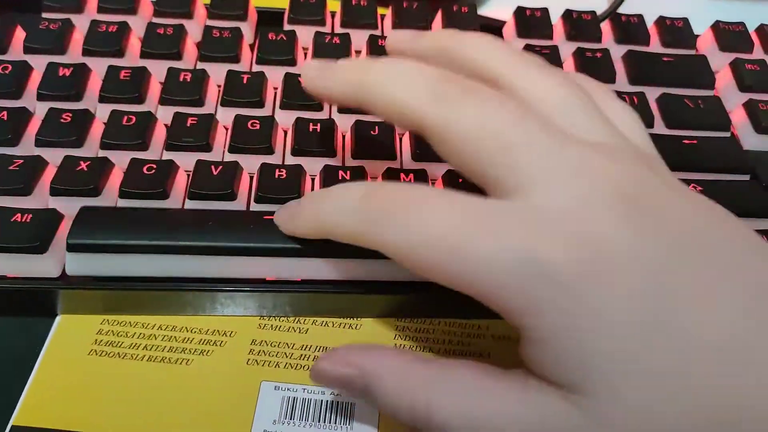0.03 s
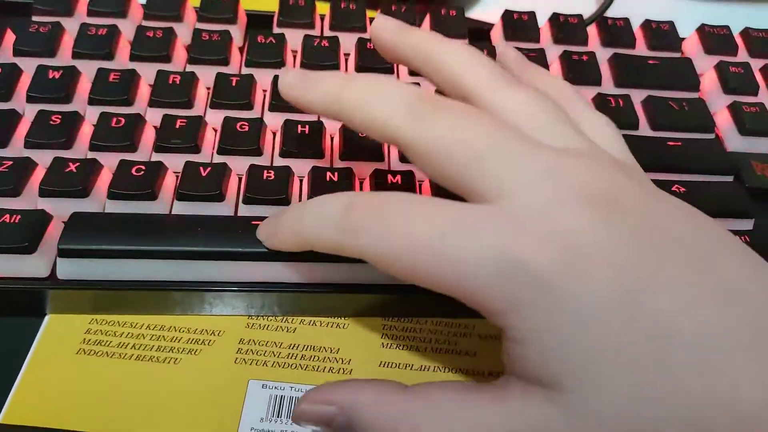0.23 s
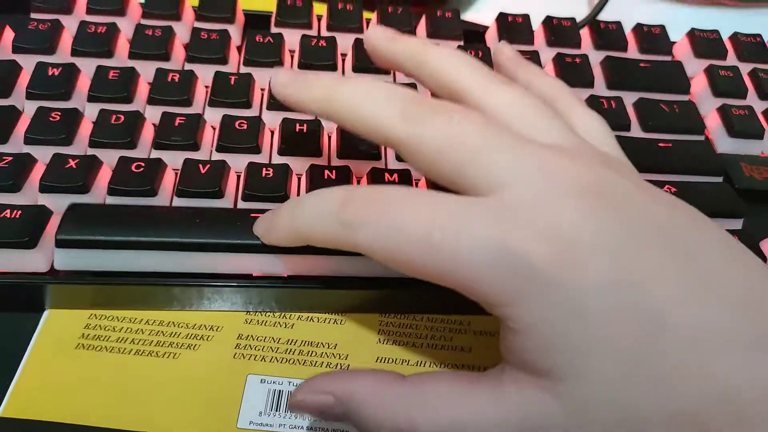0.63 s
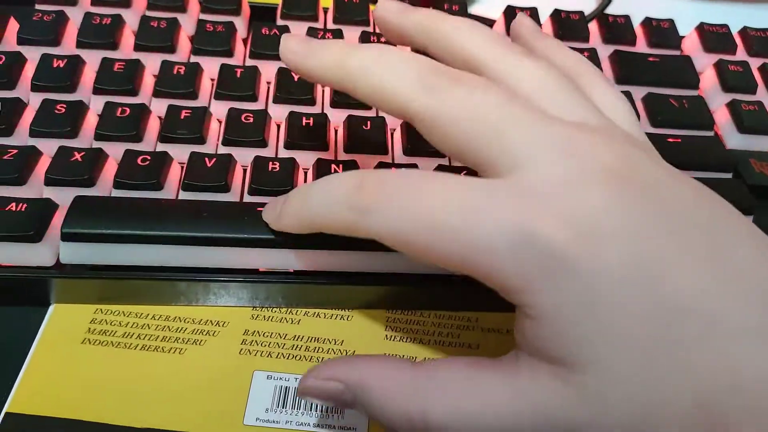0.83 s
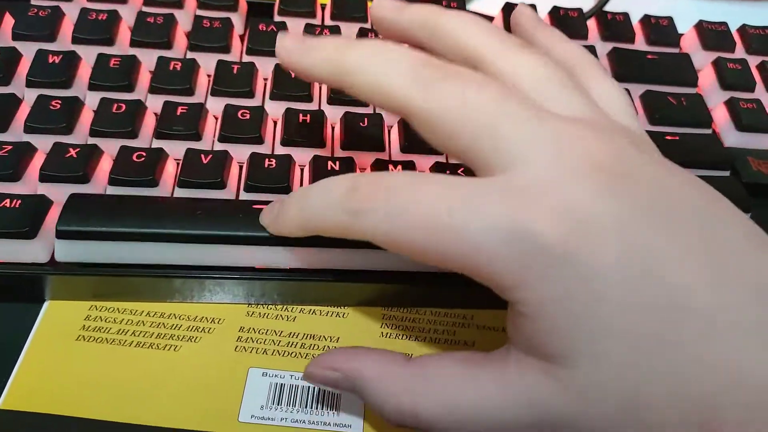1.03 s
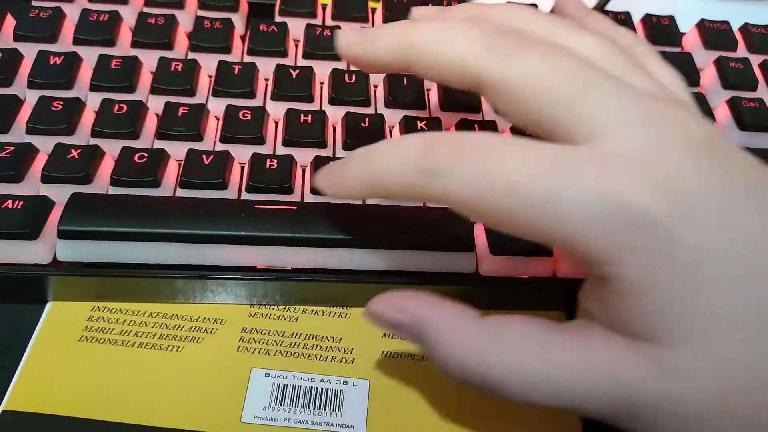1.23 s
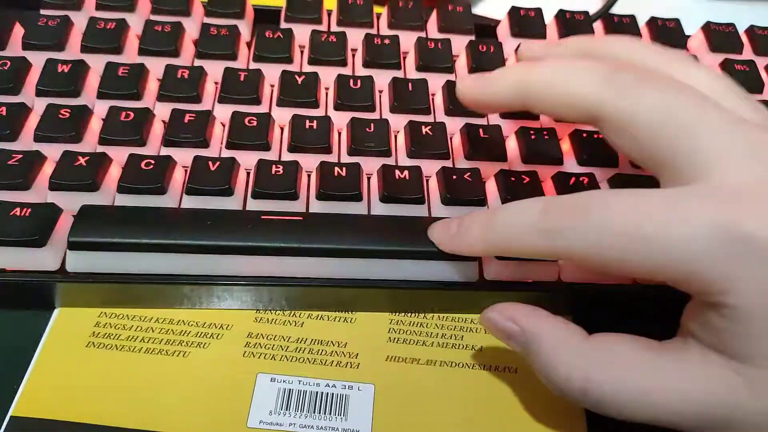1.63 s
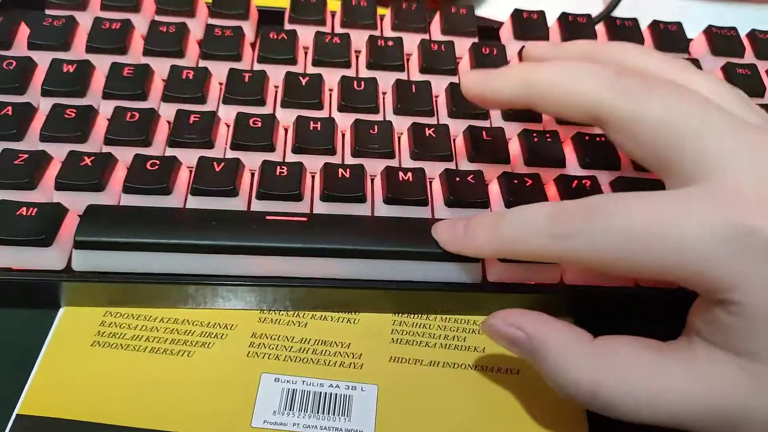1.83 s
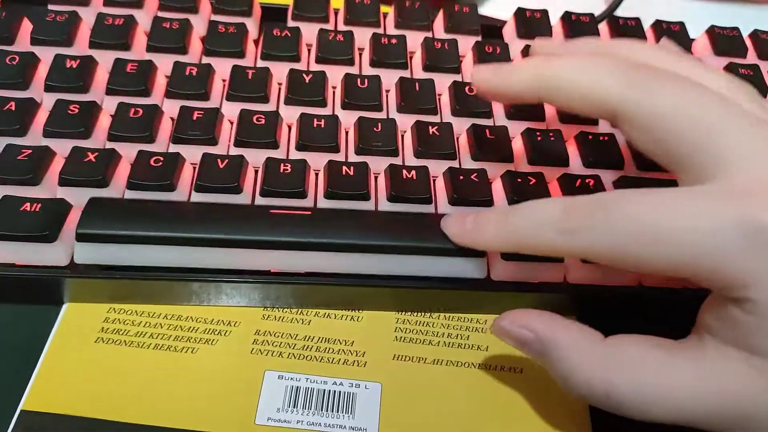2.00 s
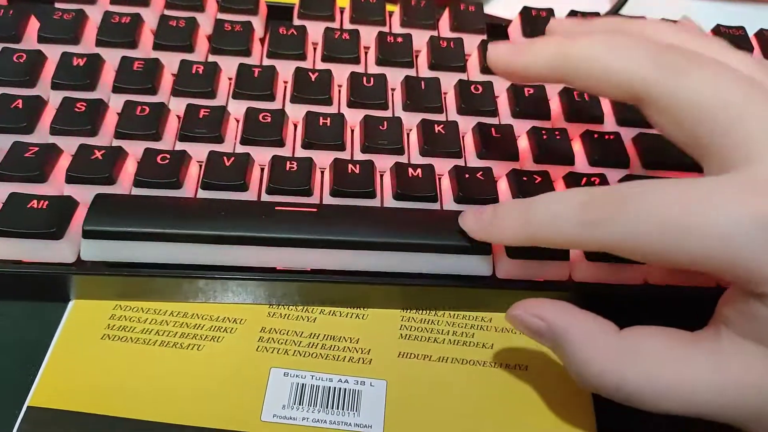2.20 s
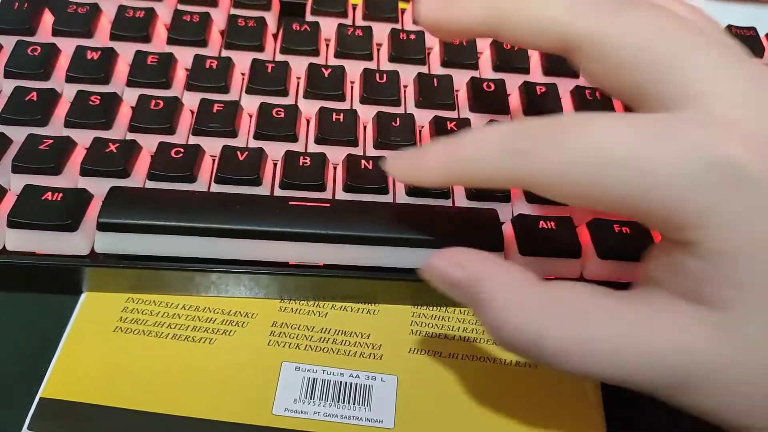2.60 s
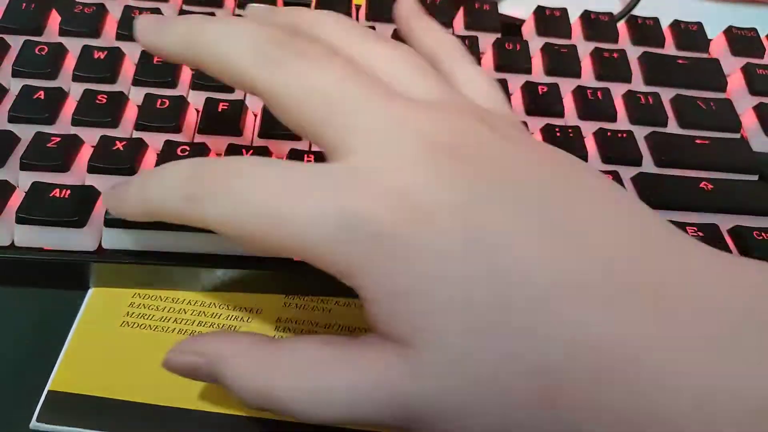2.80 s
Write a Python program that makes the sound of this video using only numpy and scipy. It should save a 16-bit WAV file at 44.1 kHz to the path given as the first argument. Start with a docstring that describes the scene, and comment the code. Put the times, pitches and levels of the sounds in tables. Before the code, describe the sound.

Sharp, rattling spacebar taps on a mechanical keyboard come in two quick, even bursts.

```python
"""Quick rattles and clacks over a faint fan hum: a finger taps a keyboard's spacebar in two runs of seven.
Each stroke has three impacts: the loose bar rattles as the finger lands, clacks on the bottom, and
clatters as it springs back up. Each impact excites the damped modes of bar, plate and case.
Desk and keys scatter the sound and the small, quiet room reverberates briefly.
At the end the hand brushes across the keys with a soft hiss of friction."""
import sys
import numpy as np
from scipy import signal
from scipy.fft import rfft, irfft
from scipy.io import wavfile

SR = 44100
rng = np.random.default_rng(int(sys.argv[2]) if len(sys.argv) > 2 else 0)


def wav_out(sig):
    """Save sig, one row per channel (or a flat mono array), as 16-bit PCM at SR to the path in sys.argv[1]."""
    wavfile.write(sys.argv[1], SR, np.round(np.clip(np.atleast_2d(sig).T, -1, 1) * 32767).astype(np.int16))


N = 130095
T = np.arange(N) / SR
BLOW_SIZE, LEAD_S = 8192, .03   # samples in one impact; time ahead of its main contact


def finger_landings():
    """Backlash: the landing finger takes up the bar's play, and the loose parts rattle."""
    # landings: (time [s], gain [dB], rattle decay time [s], treble [dB])
    touches = [(0.2078, -2, 0.0041, 2), (0.377, -9.5, 0.009, 3.5), (0.538, -10.5, 0.0066, 1),
               (0.7051, -7, 0.002, 7), (0.862, -8.5, 0.0084, 0), (1.032, -7.5, 0.0037, 6.5),
               (1.205, -8.5, 0.0021, 5), (1.5932, -5, 0.0021, 6), (1.7723, -4.5, .004, 2.5),
               (1.931, -1, 0.0033, -1.5), (2.085, -2.5, 0.0025, -4), (2.2534, -1.5, 0.0026, -1),
               (2.408, -1.5, 0.0016, 2.5), (2.566, -3, 0.0023, 1)]
    # spectral envelope of a landing: (frequency [Hz], gain [dB])
    colour = [(100, -20), (300, -3), (600, -12), (1000, 4), (1750, 1.5), (2050, 17.5), (2600, 9),
              (3100, 14.5), (4000, 9.5), (5000, -6), (7500, -8), (9500, -15.5), (14000, -10.5)]
    track = np.zeros(N)
    for time_s, db, decay_s, treble_db in touches:
        force = rattle(decay_s, snap=.29)
        add(track, time_s - LEAD_S, strike(force, db + shelved(colour, treble_db, 0), ring_db=-2.5))
    return track


def bottom_clacks():
    """Impact: the bar hits the bottom, with more bite when it is played near its end."""
    # impacts: (time [s], gain [dB], bite [dB])
    clacks = [(0.2359, -3.5, 0.5), (.4000, -.5, -1), (0.5591, -1, 1), (0.7243, -0.5, 1), (0.8811, 0, -2),
              (1.0494, -0.5, 6), (1.224, 0, -2), (1.6214, -1, 3), (1.7907, -1, 2), (1.9518, -1.5, 2),
              (2.1072, -2.5, 3), (2.2688, -.5, 1), (2.4250, -0.5, 2), (2.5831, -.5, 2.5)]
    # spectral envelope of a clack: (frequency [Hz], gain [dB])
    colour = [(100, -14.5), (230, 1.5), (310, 10.5), (440, 4.5), (530, -6.5), (830, 2.5), (1020, 14.5),
              (1400, 5), (1900, 16), (2450, 23), (3100, 22), (3550, 12), (4250, 4), (4900, 4), (6500, -8),
              (8200, -16), (9800, -6.5), (12200, -14.5), (14000, -16)]
    track = np.zeros(N)
    for time_s, db, bite_db in clacks:
        tone_db = db + at_hz(colour, grid(BLOW_SIZE)) + bite_db * bump(hz=3200, octaves=.1)
        add(track, time_s - LEAD_S, strike(bottoming_force(), tone_db, ring_db=1.5))
    return track


def spring_returns():
    """Restoring force: the bar springs against its top stop, knocking more when played near its end."""
    # returns: (time [s], gain [dB], rattle decay time [s], treble [dB], bass [dB], knock [dB], snap [ratio])
    returns = [(.302, -3.5, 0.0075, 5, 5.5, 4.5, 0.36), (.473, -2.5, .005, 5.5, 8, 1, 0.23),
               (0.639, 1, .008, 1.5, 3.5, -1.5, 0.11), (.810, -2.5, 0.0055, 4.5, 7.5, -3.5, 0.11),
               (0.965, 3.5, 0.0041, 2, 1, -2.5, 0.14), (1.1338, 4, .004, 1, 1.5, 0, 0.28),
               (1.2983, 7.5, 0.0021, 2, -5, -3, 0.41), (1.7034, 1, 0.0042, 4, -5, 6.5, 0.05),
               (1.869, 0, 0.0043, 3.5, 1.5, 6, .15), (2.026, -2.5, 0.0035, 5, -2, 8.5, 0.16),
               (2.177, -1, 0.0037, 4, 3, 2, 0.1), (2.3445, -0.5, 0.0031, 5.5, 4, 8.5, 0.2),
               (2.498, 2, 0.0032, 2.5, -2, 5, 0.18), (2.686, -4.5, 0.009, 0, -1, 4, 0.061)]
    # spectral envelope of a return: (frequency [Hz], gain [dB])
    colour = [(100, -21.5), (280, 1), (400, -6), (660, -4), (800, 6.5), (1100, 6), (1700, 7.5),
              (2050, 14.5), (2550, 8.5), (3100, 14.5), (3600, 8.5), (4300, 4.5), (5000, -7.5), (7000, -8.5),
              (9500, -12), (14000, -14)]
    track = np.zeros(N)
    for time_s, db, decay_s, treble_db, bass_db, knock_db, snap in returns:
        tone_db = db + shelved(colour, treble_db, bass_db) + knock_db * bump(hz=850, octaves=.18)
        add(track, time_s - LEAD_S, strike(rattle(decay_s, snap), tone_db, ring_db=-2.5))
    return track


def click():
    """Impulse: one hard contact has a flat spectrum."""
    return signal.unit_impulse(BLOW_SIZE, int(LEAD_S * SR))


def rattle(decay_s, snap, contacts_per_s=4500, rise_share=.84, scatter_db=3):
    """Shot noise: tiny contacts swell and die around a hard one of relative size snap; energy 1."""
    t = np.arange(BLOW_SIZE) / SR - LEAD_S
    swell = np.exp(-np.abs(t) / (decay_s * np.where(t < 0, rise_share, 1)))
    sizes = from_db(scatter_db * rng.standard_normal(BLOW_SIZE)) * rng.choice([-1, 1], BLOW_SIZE)
    contacts = swell * sizes * (rng.random(BLOW_SIZE) < contacts_per_s / SR)
    force = contacts / np.linalg.norm(contacts) + snap * click()
    return force / np.linalg.norm(force)


def bottoming_force(bounce_s=.001908, bounce_db=-15, chatter_delay_s=.002, chatter_db=-1.5):
    """Rebound: one firm hit is followed by a small bounce and a burst of bright chatter."""
    hit = signal.sosfilt(signal.butter(1, 9000, fs=SR, output="sos"), click())
    bounce = from_db(bounce_db) * np.roll(hit, int(bounce_s * SR))
    highpass = signal.butter(3, 4530, "high", fs=SR, output="sos")
    chatter = signal.sosfilt(highpass, rattle(decay_s=.001, snap=0))
    return hit + bounce + from_db(chatter_db) * np.roll(chatter, int(chatter_delay_s * SR))


def strike(force, tone_db, ring_db, scatter_db=1.3, detune=.005):
    """Modal superposition: a force rings damped modes, which vary per blow as the finger shifts."""
    # modes of bar, plate and case: (frequency [Hz], T60 [s], relative gain [dB])
    modes = [(322, 0.11, -0.5), (447.4, 0.062, -2.5), (760, 0.071, -9), (1065.5, 0.091, -5.5),
             (1742, 0.073, -3), (2000, 0.076, -7), (2387, 0.029, -3), (2425, 0.023, -5.5),
             (2930, 0.12, -20), (3100, 0.02, -9.5), (3180, 0.075, -22), (4960, 0.066, -25)]
    hz, body = grid(BLOW_SIZE), 1
    for mode_hz, t60, lift_db in modes:
        gain_draw, pitch_draw = rng.standard_normal(2)
        gain = from_db(ring_db + lift_db + scatter_db * gain_draw)
        tuned_hz = mode_hz * (1 + detune * pitch_draw)
        damping = 1j * hz * np.log(1000) / (np.pi * t60)
        body = body + gain * damping / (tuned_hz ** 2 - hz ** 2 + damping)
    return irfft(rfft(force) * minimum_phase(tone_db) * body)


def direct_sound(source):
    """Path difference: the sound arrives later on the right and, at most frequencies, weaker."""
    # right side against left: (frequency [Hz], gain [dB])
    right_gain = [(200, -18.5), (400, 5), (750, -18), (1050, -6), (1700, -11.5), (2400, -13.5), (2900, -20),
                  (3300, -5), (5000, -6.5), (9000, -2.5), (14000, -5)]
    # later arrival on the right: (frequency [Hz], phase delay [s])
    right_lag = [(350, .00001), (1100, 0.000098), (2300, .0002), (3100, 0.000195), (4200, 0.000034),
                 (8000, 0.000038), (14000, 0.000019)]
    hz = grid(N)
    right_path = from_db(at_hz(right_gain, hz)) * np.exp(-2j * np.pi * hz * at_hz(right_lag, hz))
    return np.array([source, irfft(rfft(source) * right_path, N)])


def desk_scatter(tracks):
    """Early reflections: desk and keys scatter each kind of contact alike in level and decay, each along its
    own echo pattern."""
    # scatter from desk and keys: (frequency [Hz], level against the direct sound [dB])
    levels = [(200, -15), (1000, -5), (2600, -9.5), (5000, -5), (12000, -12)]
    return sum(reflections(track, levels, t60s=[(1, .018)], delay_s=.001229) for track in tracks)


def room_reverberation(source, right_db=-2):
    """Reverberation: repeated reflections ring on briefly as the room absorbs them."""
    # reverberation on the left: (frequency [Hz], level against the direct sound [dB])
    levels = [(150, -4.5), (300, -7), (600, -9), (1000, -12), (2600, -12.5), (5000, -7.5), (8000, -11.5),
              (14000, -16.5)]
    # decay of the room: (frequency [Hz], T60 [s])
    t60s = [(200, .45), (1000, 0.35), (3000, 0.38), (7000, 0.39), (14000, .3)]
    return reflections(source, levels, t60s, delay_s=.0065) * from_db([[0], [right_db]])


def reflections(source, levels, t60s, delay_s):
    """Diffuse field: dense echoes act as noise that decays exponentially in half-octave bands."""
    # left-right likeness of the echoes: (frequency [Hz], coherence [ratio])
    coherence = [(300, 0.85), (600, 0.23), (1200, 0.35), (2500, 0.041)]
    t, response = T[:SR // 2], 0
    edges_hz = 88 * 2 ** np.arange(0, 7.6, .5)
    white = rng.standard_normal((2, 2, len(t)))
    for k, (low, high) in enumerate(zip(edges_hz, edges_hz[1:])):
        hz = np.sqrt(low * high)
        alike = at_hz(coherence, hz)
        mid, side = white[k % 2]
        echoes = np.sqrt(1 + alike) * mid + np.sqrt(1 - alike) * side * [[1], [-1]]
        decay = np.exp(-np.log(1000) * t / at_hz(t60s, hz))
        bandpass = signal.butter(2, [low, high], "band", fs=SR, output="sos")
        band = signal.sosfilt(bandpass, echoes * decay + 1e-18)
        gain = np.sqrt(2 * (high - low) / SR) * from_db(at_hz(levels, hz))
        response = response + gain * band / np.linalg.norm(band, axis=1, keepdims=True)
    response = np.pad(response, ((0, 0), (int(delay_s * SR), 0)))
    return signal.fftconvolve(source[None], response, axes=1)[:, :N]


def hand_brush(start_s=2.767, rise_s=.081, level_db=-63.5):
    """Sliding friction: the hand makes soft broadband noise as it crosses the keys."""
    # friction spectrum: (frequency [Hz], relative density [dB])
    colour = [(400, -19.5), (1200, -9), (2800, -7), (5000, -7), (7200, -8), (9000, -21), (14000, -25)]
    return from_db(level_db) * np.clip((T - start_s) / rise_s, 0, 1) * noise(colour)


def fan(air_db=-54, right_db=-1):
    """Broadband and tonal noise: a steady, dull rush of air carries a few weak hum lines."""
    # air spectrum: (frequency [Hz], relative density [dB])
    colour = [(25, -9), (60, -6), (110, -7), (160, -2.5), (300, -0.5), (350, -10), (500, -1), (760, -12.5),
              (2500, -19), (4500, -33), (6500, -41), (9000, -52), (15000, -55)]
    # hum lines on the left: (frequency [Hz], rms level [dB])
    lines = [(98, -74.5), (180, -64.5), (242, -69.5), (284, -60.5)]
    # left-right likeness of the air noise: (frequency [Hz], coherence [ratio])
    coherence = [(40, 0.73), (250, 0.84), (700, 0.45), (2000, 0.13), (10000, 0.043)]
    alike = at_hz(coherence, grid(N))
    mid, side = irfft(rfft(noise(colour)) * np.sqrt([(1 + alike) / 2, (1 - alike) / 2]), N)
    air = from_db(air_db) * np.array([mid + side, mid - side])
    hum = sum(np.sqrt(2) * from_db(db) * np.sin(2 * np.pi * (hz * T + rng.random())) for hz, db in lines)
    return (air + hum) * from_db([[0], [right_db]])


def noise(colour):
    """Spectral shaping: two independent channels of coloured noise, rms 1."""
    white = rng.standard_normal((2, N))
    coloured = irfft(rfft(white) * from_db(at_hz(colour, grid(N))), N)
    return coloured / coloured.std()


def shelved(colour, treble_db, bass_db, treble_hz=4200, bass_hz=1400):
    """Shelving: a contact's spectral envelope in dB, with its own treble and bass."""
    hz = grid(BLOW_SIZE)
    treble = treble_db * hz ** 4 / (hz ** 4 + treble_hz ** 4)
    bass = bass_db / (1 + (hz / bass_hz) ** 4)
    return at_hz(colour, hz) + treble + bass


def bump(hz, octaves):
    """Spectral peak: a Gaussian of height 1 on the log-frequency axis."""
    return np.exp(-.5 * (np.log2((grid(BLOW_SIZE) + 1) / hz) / octaves) ** 2)


def minimum_phase(db):
    """Causality: a response with these gains in which nothing sounds before the blow."""
    cepstrum = irfft(np.log(from_db(db)))
    half = len(cepstrum) // 2
    cepstrum[1:half] *= 2
    cepstrum[half + 1:] = 0
    return np.exp(rfft(cepstrum))


def from_db(db):
    """Decibels to amplitude ratio."""
    return 10 ** (np.asarray(db) / 20)


def at_hz(points, hz):
    """Interpolation of a table on a log-frequency axis."""
    frequencies, values = np.array(points).T
    return np.interp(np.log(np.maximum(hz, 1)), np.log(frequencies), values)


def grid(size):
    """Fourier frequencies [Hz] of that many samples."""
    return np.arange(size // 2 + 1) * SR / size


def add(track, time_s, sound):
    """Superposition: a sound joins the track at a given time."""
    start = max(int(round(time_s * SR)), 0)
    track[start:start + len(sound)] += sound[:max(N - start, 0)]


def scene():
    """Superposition: the bar's direct sound, its reflections, the fan and the hand add in the air."""
    tracks = finger_landings(), bottom_clacks(), spring_returns()
    bar = sum(tracks)
    return direct_sound(bar) + desk_scatter(tracks) + room_reverberation(bar) + fan() + hand_brush()


def record(dry, ceiling=.95, stopband_hz=16200):
    """Saturation and band limiting: the highest peaks are rounded off and the top treble is cut."""
    rounded = dry / (1 + (dry / ceiling) ** 6) ** (1 / 6)
    return signal.sosfilt(signal.cheby2(14, 70, stopband_hz, fs=SR, output="sos"), rounded)


dry = scene()
out = record(dry)
wav_out(out)
```